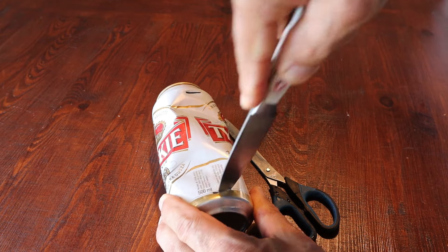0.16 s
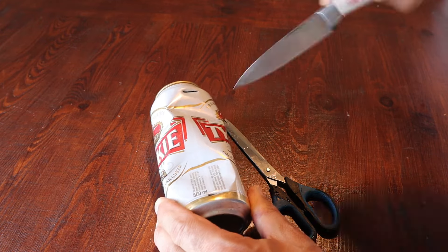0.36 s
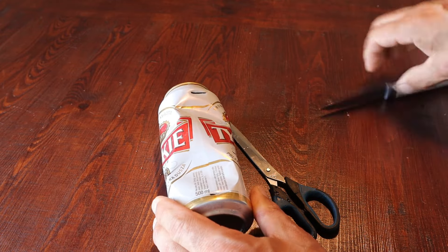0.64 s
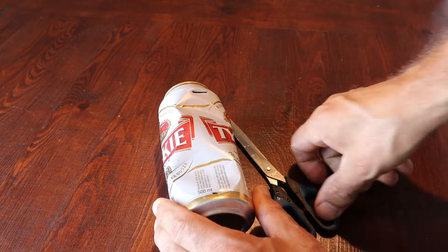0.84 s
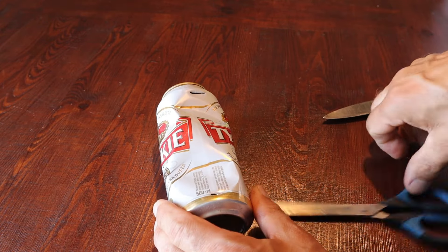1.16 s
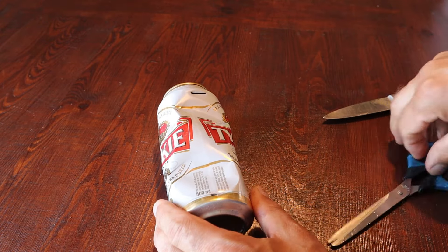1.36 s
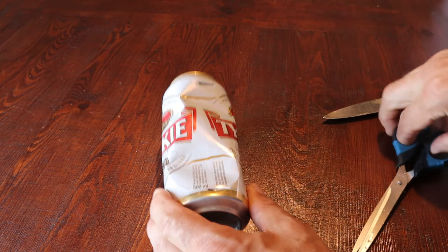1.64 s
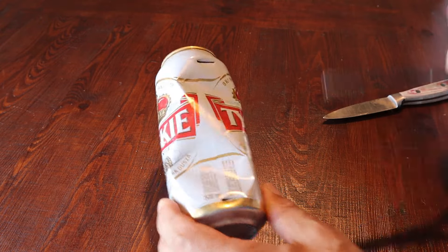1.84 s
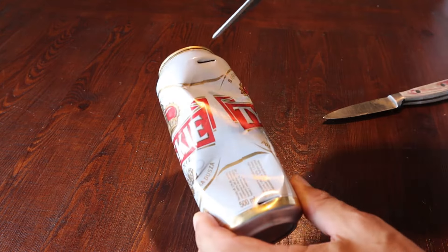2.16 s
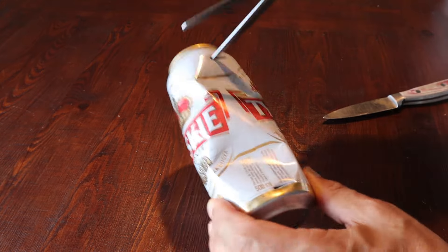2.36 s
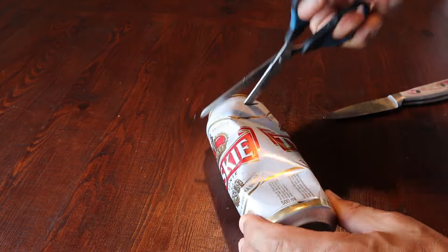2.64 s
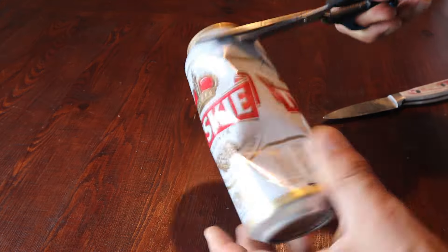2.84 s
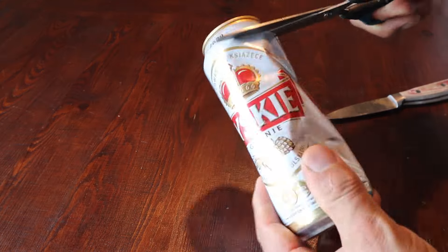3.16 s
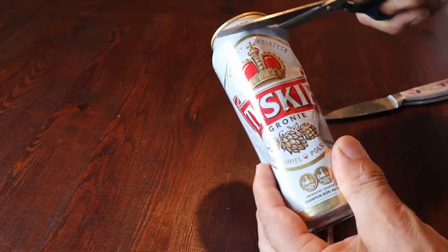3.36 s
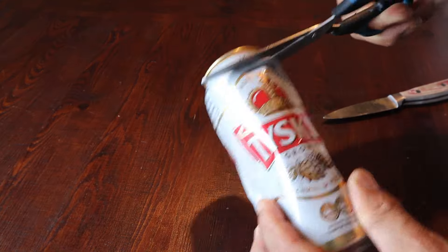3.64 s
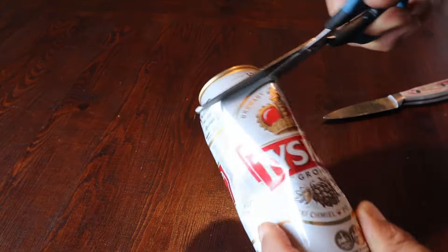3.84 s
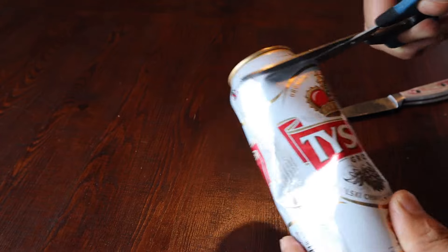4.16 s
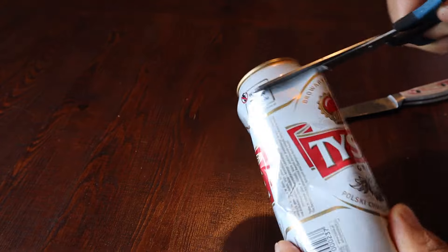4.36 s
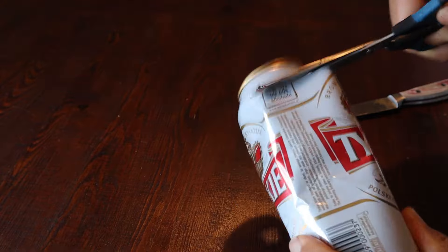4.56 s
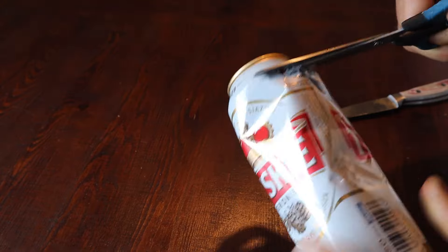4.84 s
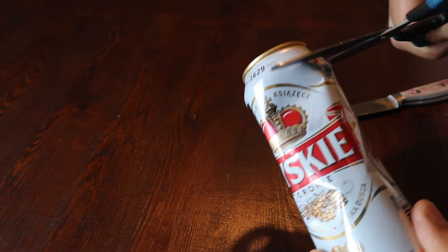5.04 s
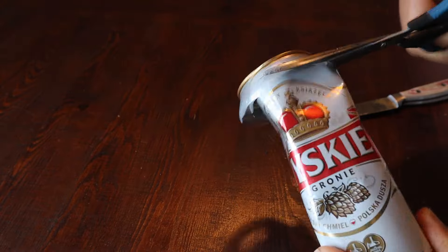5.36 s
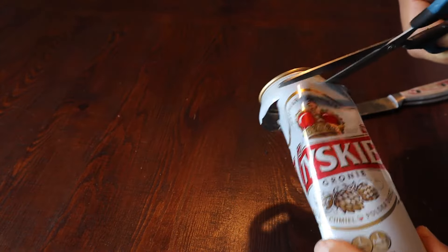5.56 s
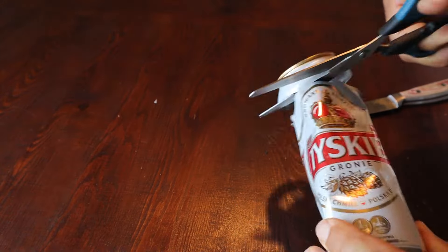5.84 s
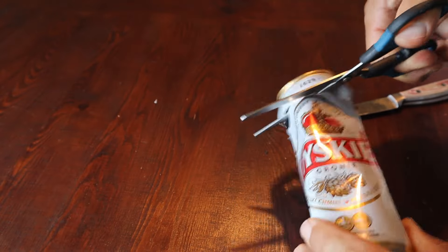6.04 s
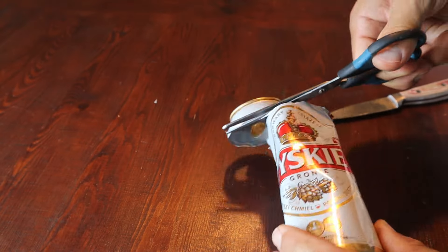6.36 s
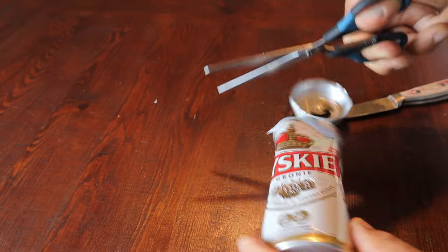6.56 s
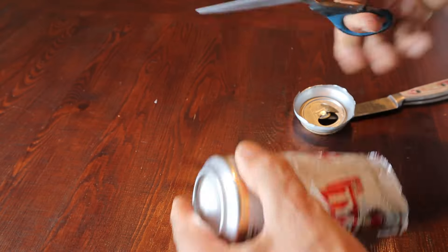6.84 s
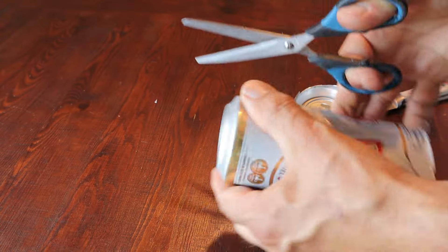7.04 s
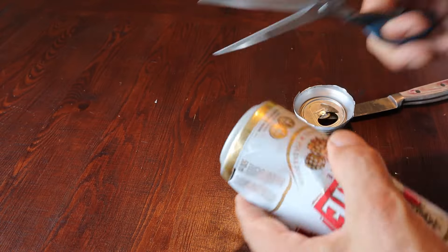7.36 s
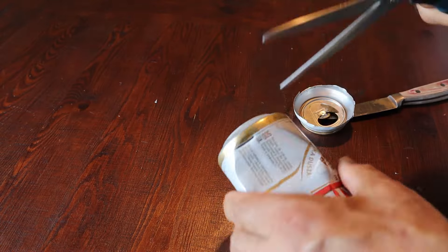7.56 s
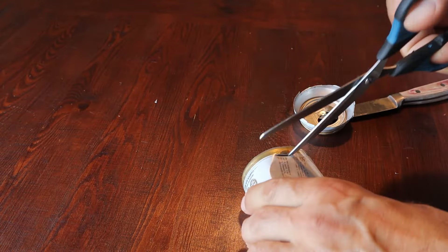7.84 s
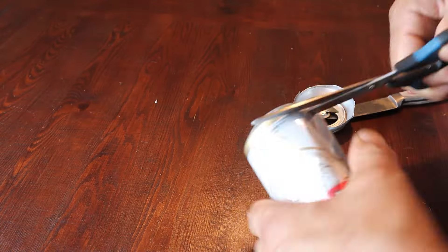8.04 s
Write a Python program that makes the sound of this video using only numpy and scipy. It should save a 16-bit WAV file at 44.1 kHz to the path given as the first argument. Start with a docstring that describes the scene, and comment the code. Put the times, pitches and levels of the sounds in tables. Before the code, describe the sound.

Close up in a small room, a knife pushes into an empty aluminium can with dull thuds and sharp buckling cracks. The knife clacks down on a wooden table and scissors scrape off it. After a brief lull the can pops and dents, then scissors bite around it in irregular crinkly crunches. The cut top drops with a short bright rattle, the can flexes, and a new cut begins.

```python
"""Cutting open a thin aluminium can

A knife stabs the can and is put down on a wooden table; scissors are dragged off the table
and cut round the can's neck in quick crinkling bites. The top drops and rings, and a new cut begins.
Every contact is a short swarm of tiny snaps filtered by the resonances of can or table; slides are
shaped noise and snaps, ringing is decaying sines, and a small room adds close echoes over a faint hush."""
import sys
import numpy as np
from scipy import signal
from scipy.fft import rfft, irfft
from scipy.io import wavfile
from scipy.ndimage import uniform_filter1d

SR = 44100
rng = np.random.default_rng(int(sys.argv[2]) if len(sys.argv) > 2 else 0)


def write(x):
    x = np.atleast_2d(x).T
    wavfile.write(sys.argv[1], SR, np.round(np.clip(x, -1, 1) * 32767).astype(np.int16))


N = 361179

EDGE_HZ = 15950  # upper band limit

# The severed top hits the table and rattles. Each row: time in seconds (the crack falls 1 ms earlier),
# decay time in seconds, level in dB at 850-2800 Hz before the layer's gain, then body, edge and fizz
# (below, above and far above that band) in dB relative to that level, low ring of the panel in Hz,
# upper ring in Hz, ring of the sliver or edge in Hz.
LID_BOUNCES = [(6.452, 0.0083, -39.5, 5.5, 10.2, 19, 408, 2720, 7600),
               (6.526, 0.01, -43.5, 9, 12, 6, 403, 2310.0, 6840.0),
               (6.588, 0.007, -49.5, 13, 18, 24, 405, 2770, 7300),
               (6.62, 0.0061, -25, 1, 12.5, -1, 760, 2360, 4040.0),
               (6.647, 0.011, -26, 5.5, 7.4, 6.5, 517, 1970, 4080),
               (6.671, 0.014, -28.5, 0.5, 9.1, -4, 800, 2430, 4030),
               (6.712, 0.011, -42, 3.5, 11, 8.5, 660, 2330.0, 4030)]
# Resonances of the can. Each row: frequency in Hz, width in Hz, peak in dB relative to the flat part.
CAN_MODES = [(370, 26, -8), (427.3, 68, -1), (603.3, 25, 1), (763.7, 20, 3.5), (892, 24, 3.5),
             (1103, 27, -1), (1380, 37, -4), (1540, 28, -5), (2152, 28, 1.5), (8650, 180, -10)]
# Resonances of the table. Each row: frequency in Hz, width in Hz, peak in dB relative to the flat part.
TABLE_MODES = [(98, 12, 11.5), (205, 23, 11), (339, 12, -7), (405, 36, 2.5), (519, 17, -21.5),
               (825, 16, -11), (1210, 33, -21.5), (1170, 29, -5.5)]
# Spectrum of the thin wall. Each row: frequency in Hz, relative level in dB.
CAN_COLOUR = [(40, -22), (150, -22), (260, -5), (380, 2.5), (1500, 1.5), (2200, -5.5), (3200, -12.5),
              (4700, -14), (6200, -16), (8200, -13.5), (10300, -20), (12500, -18), (16000, -27)]
# Spectrum of hard objects on wood. Each row: frequency in Hz, relative level in dB.
TOOL_COLOUR = [(40, -22), (100, 1.5), (250, -5.5), (450, 0.5), (1200, 1), (2500, -13), (4500, -19.5),
               (8000, -20.5), (11000, -25.5), (16000, -30.5)]


def amp(db):
    """Level law: decibels to an amplitude ratio."""
    return 10 ** (np.asarray(db) / 20)


def evened(x):
    """Normalization: scales a signal to rms 1."""
    return x / np.sqrt(np.mean(x ** 2) + 1e-20)


def read(points, hz):
    """Spectral interpolation: reads a curve along a logarithmic frequency axis."""
    f, value = np.transpose(points)
    return np.interp(np.log(hz + 1), np.log(f), value)


def add(mix, s, sound):
    """Superposition: sums a sound into the mix at time s."""
    start = round(s * SR)
    part = mix[max(start, 0):max(start + len(sound), 0)]
    part += sound[max(-start, 0):][:len(part)]


def smooth_noise(shape, size):
    """Low-passed randomness: noise averaged over size samples, rms 1."""
    return evened(uniform_filter1d(rng.standard_normal(shape), size=size, axis=-1))


def resonances(modes, hz):
    """Modal response: each causal mode lifts a narrow peak out of a flat spectrum."""
    return np.prod([1 + amp(db) / (1 + 2j * (hz - f) / width) for f, width, db in modes], axis=0)


def coloured(x, colour, modes=()):
    """Linear filtering: shapes x by a spectrum and the modes of a body; rms 1."""
    hz = np.fft.rfftfreq(N, 1 / SR)
    return evened(irfft(rfft(x) * amp(read(colour, hz)) * resonances(modes, hz), N))


def snaps(size, per_s, spread_db):
    """Impulsive excitation: a random train of fractures or slips whose sizes scatter with spread_db."""
    chance = rng.random(size)
    big = rng.exponential(1, size)
    sign = rng.choice([-1., 1.], size)
    return (chance < per_s / SR) * sign * amp(spread_db * np.minimum(big, 3))


def ticking(size):
    """Intermittent tearing: sharp surges that decay after each jump of the tear; mean 1."""
    ticks_per_s, tick_s = 260, 0.0022
    jumps = (rng.random(size) < ticks_per_s / SR) * rng.uniform(0.59, 1, size)
    surges = signal.lfilter([1], [1, -np.exp(-1 / (tick_s * SR))], jumps)
    return surges / (surges.mean() + 1e-12)


def steadied(parts, force):
    """Forced response: holds the loudness of each band close to the force that drives it."""
    steady = .68  # 0-1: how closely the sound follows the force
    wanted, found = abs(uniform_filter1d(np.array([force, parts]) ** 2, size=150, axis=2))
    found = found / found.max(1, keepdims=True)
    return parts * ((wanted + 1e-9) / (found + 1e-9)) ** (steady / 2)


def contacts(rows, colour, modes, per_s, spread_db, crack, rise, ring_db, ring_width_hz, dent_db, tail_db):
    """Excitation and resonance: swarms of snaps swell to a crack and die, ringing panel and body."""
    band_edges_hz = [850, 2800, 7000]  # Each entry: upper edge in Hz of the body, mids and edge bands.
    # Weak tearing and ringing after each crack, one row each for body, mids, edge and fizz.
    # Each row: level in dB relative to the force (before tail_db), decay in seconds, depth of ticks 0-1.
    aftermath = [(-15, 0.014, 0), (-18.5, 0.013, 0.16), (-19, .026, 0.26), (-26.5, .025, 0.3)]
    bend = .018  # share by which the body's modes shift from one contact to the next
    swell_power = 1.22  # 1 would be an exponential swell, more is steeper
    size = 12288
    crest = size // 4
    out, hz = np.zeros(N), np.fft.rfftfreq(size, 1 / SR)
    t = (np.arange(size) - crest) / SR

    below = [1 / (1 + (hz / edge) ** 6) for edge in band_edges_hz]
    bands = np.diff([0 * hz, *below, 1 + 0 * hz], axis=0) * amp(read(colour, hz))
    after_db, after_s, depth = np.transpose(aftermath)[:, :, None]
    after = (t > 0) * amp(after_db + tail_db) * np.exp(-abs(t) / after_s)

    for s, length, db, body_db, edge_db, fizz_db, low_hz, high_hz, sliver_hz in rows:
        away = np.where(t < 0, (abs(t) / (length * rise)) ** swell_power, abs(t) / length)
        force = np.exp(-away) + after
        swarm = snaps(size, per_s, spread_db) * force.mean(0)
        swarm[crest] += crack * np.linalg.norm(swarm)

        body = resonances(modes, hz * np.exp(bend * rng.standard_normal()))
        # low and upper ring of the panel, and a sliver or struck edge in the treble
        rings = [(low_hz, ring_width_hz, ring_db), (high_hz, 160, 7), (sliver_hz, 200, 3)]
        panel = resonances(rings, hz)
        # every point of contact has its own scatter of weaker treble modes
        dents_hz = np.geomspace(1900, 13000, num=12) * np.exp(rng.uniform(-.08, .08, size=12))
        panel *= resonances([(f, ring_width_hz + 0.0058 * f, dent_db) for f in dents_hz], hz)
        # a stiffer panel radiates little below its lowest mode
        panel *= 1 - 0.46 / (1 + (hz / (0.48 * low_hz)) ** 6)

        parts = steadied(irfft(rfft(swarm) * body * panel * bands, size), force)
        parts = parts * (1 - depth + depth * ticking(size))
        # levels become energies over the length of the swarm
        levels = amp(db + np.array([body_db, 0, edge_db, fizz_db])) * np.sqrt(length * SR * (1 + rise) / 2)
        add(out, s + t[0] - .001, levels / (np.linalg.norm(parts, axis=1) + 1e-12) @ parts)
    return out


def background_hush():
    """Partial coherence: steady coloured noise, partly common to both ears and partly separate."""
    # Spectrum of the hush. Each row: frequency in Hz, relative level in dB.
    hush_colour = [(20, 4), (60, 2), (130, -0.5), (220, 1.5), (500, 1), (1200, -2.5), (3000, -8.5),
                   (8000, -13), (16000, -15)]
    shared, left, right = (coloured(noise, hush_colour) for noise in rng.standard_normal((3, N)))
    return amp(-64.0) * (shared + .5 * np.array([left, right]))


def room(x, build_s):
    """Reverberation: dense echoes, each band dying at its own rate, from three slowly alternating tails."""
    # Reverberation time. Each row: frequency in Hz, time to fall by 60 dB in seconds.
    room_t60 = [(100, 0.23), (400, 0.23), (1000, 0.21), (3000, 0.2), (8000, 0.28), (16000, 0.17)]
    # Strength of the echoes. Each row: frequency in Hz, level in dB.
    room_db = [(100, -11.5), (500, -5.5), (1500, -11.5), (4500, -9), (12000, -16.5)]
    out, s = np.zeros(N), np.arange(N) / SR
    for turn in np.arange(3) / 3:
        hz, t, z = signal.stft(rng.standard_normal(SR // 2), SR, nperseg=256)
        fall = amp(-60 * t / read(room_t60, hz)[:, None]) * (1 - np.exp(-t / build_s))
        fall *= amp(read(room_db, hz))[:, None] / np.sqrt((fall ** 2).mean(1, keepdims=True) * SR / 2)
        echoes = signal.istft(z * fall, SR, nperseg=256)[1]
        # the squares of the three shares always sum to 1
        share = np.sqrt(2 / 3) * np.cos(np.pi * (s + turn))
        out += signal.fftconvolve(x * share, echoes)[:N]
    return out


def widen(x, drift):
    """Interaural phase: both ears get one sound turned apart; the turn wanders more at higher pitch."""
    # The stereo image shifts from passage to passage. Each row: start in seconds, radians by which left
    # leads in the bass, Hz where the bass ends, radians in the mids, Hz where they end, radians in the
    # upper mids, Hz where they end, radians in the treble, Hz where it ends, radians above.
    image = [(0, 0.43, 450, 3.5, 1270, 0.66, 2220, 1.27, 3700, 1.22),
             (0.53, 0.53, 670, -2.5, 1410, 1.25, 1800, 0.6, 2850, -1.75),
             (1.41, -2.5, 580, 0.5, 3770, 3.5, 4970, 0.6, 6530, 1.45),
             (2.2, 4, 410, 1.5, 620, -1.96, 1360, 1, 3945, -1.75),
             (2.55, 3.5, 480, -1.5, 1140, 1.16, 3700, 3, 4600, 1.82),
             (3.1, -1.5, 970, 0.68, 1570, -1.9, 2320, 2.5, 2800, -1.77),
             (3.35, -1.53, 1010, 0.52, 1800, 3, 2910, -2.1, 6100, -1.68),
             (4.29, -1.43, 710, 0.93, 1310, 2.5, 2430, 2, 3330, 1.7),
             (5.0, -1.27, 1310, -1.5, 1790, 2.2, 2930, -2, 7800, -1.55),
             (5.45, -1.3, 1790, -2.22, 3920, 1, 5460, 3, 7700, -1.47),
             (6.3, -1, 1180, 2, 2630, 0.73, 4450, -1.87, 7370, -1.15),
             (6.93, -2, 440, -0.8, 2430, 1.57, 3890, -1.85, 5510, -1.4),
             (7.75, 1.5, 320, 3.5, 643, 0.8, 1900, -1.85, 8100, 0.6),
             (8.02, 2.8, 540, 0.87, 1230, 1.15, 2930, 3.5, 4340, 1.8)]
    hz, t, z = signal.stft(x, SR, nperseg=1024, noverlap=768)
    f = hz[:, None]
    passage = np.searchsorted([row[0] for row in image[1:]], t, "right")
    _, bass, bass_hz, mids, mids_hz, upper, upper_hz, treble, treble_hz, top = np.array(image)[passage].T
    in_band = [f < bass_hz, f < mids_hz, f < upper_hz, f < treble_hz]
    lead = np.select(in_band, [bass, mids, upper, treble], top) * (f > 0)
    wander = rng.standard_normal(z.shape)
    for _ in range(2):
        wander = uniform_filter1d(uniform_filter1d(wander, size=12, axis=0), size=110, axis=1)
    lead = uniform_filter1d(lead, size=3, axis=1) + drift * evened(wander) * np.sqrt(f / EDGE_HZ)
    pair = z * np.exp(.5j * np.array([lead, -lead]))
    return signal.istft(pair, SR, nperseg=1024, noverlap=768)[1][:, :N]


def table(cuts, per_s, spread_db, dull_hz):
    """Friction and structure-borne sound: wood scrapes, rumbles and shakes with the cuts, under low thuds."""
    # Tools and can are dragged over the wood. Each row: start in seconds, length in seconds,
    # rumble of the table in dB, scrape in dB.
    slides = [(0.069, 0.27, -42.5, -60), (0.597, 0.087, -48.5, -40.5), (0.714, 0.15, -36, -43),
              (0.886, 0.16, -46, -56), (1.037, 0.19, -40.5, -41), (1.247, 0.07, -39, -38.5),
              (1.458, 0.011, -37.5, -43), (1.529, 0.14, -44, -35.5), (2.51, 0.024, -45, -51.5),
              (6.44, 0.28, -48.5, -74), (7.892, 0.093, -40.5, -34)]
    # Low thuds of the stabbed can and of the knife put down on the table. Each row: start in seconds,
    # envelope peak in dB, frequency in Hz, twice the time from start to envelope peak in seconds.
    thuds = [(0.079, -18, 203, 0.0092), (0.11, -27.5, 336, 0.017), (0.174, -21.5, 302, 0.018),
             (0.196, -25, 334.6, 0.036), (0.268, -25, 311.4, 0.035), (0.334, -25, 326, 0.011),
             (0.683, -27.5, 192, 0.0021)]
    # Spectrum of the rumble. Each row: frequency in Hz, relative level in dB.
    rumble_colour = [(20, -24), (50, -8.5), (90, 0.5), (150, 0), (220, 0.5), (320, -9), (600, -48),
                     (2000, -73)]
    attack_s, release_s = 0.012, 0.021
    cut_rumble_db = -31  # share of each snip that reaches the table through the can
    lean_s, lean_db_per_s = 4.3, 9.5  # for 1.5 s until then the hand leans ever more firmly on the can

    now = np.arange(N) / SR
    weight, scrape = np.zeros((2, N))
    for s, length, rumble_db, scrape_db in slides:
        stroke = np.clip((now - s) / attack_s, 0, 1)
        stroke = stroke * np.exp(-np.maximum(now - s - length, 0) / release_s)
        weight += amp(rumble_db) * stroke
        scrape += amp(scrape_db) * stroke

    shake = np.sqrt(abs(uniform_filter1d(cuts ** 2, size=1300)))
    shake *= amp(np.clip(now - lean_s, -1.5, 0) * lean_db_per_s)
    rumble = coloured(rng.standard_normal(N), rumble_colour, TABLE_MODES)
    out = (weight + amp(cut_rumble_db) * shake) * rumble

    dulling = signal.butter(1, [300, dull_hz], "band", fs=SR, output="sos")
    grit = signal.sosfilt(dulling, snaps(N, per_s, spread_db))
    out += scrape * coloured(grit, TOOL_COLOUR, TABLE_MODES)

    t = np.arange(SR // 4) / SR
    for s, db, hz, decay in thuds:
        swell = 2 * t / decay * np.exp(1 - 2 * t / decay)
        add(out, s, amp(db) * swell * np.sin(2 * np.pi * hz * t))
    return out


def blades(waver, flutter_db):
    """Friction-driven vibration: steel sliding on steel gives thin tones, unsteady in pitch and level."""
    # The scissor blades sing faintly as they open. Each row: start in seconds, length in seconds,
    # level in dB before flutter, mean frequency in Hz.
    blade_song = [(1.957, 0.079, -54, 4660), (2.04, 0.097, -56.5, 4655), (2.155, 0.14, -62, 5080)]
    out = np.zeros(N)
    for s, length, db, hz in blade_song:
        size = round(length * SR)
        grip, bend = smooth_noise((2, SR), 500)[:, :size]
        phase = 2 * np.pi * np.cumsum(hz * (1 + waver * bend)) / SR
        add(out, s, np.sqrt(np.hanning(size)) * amp(db + flutter_db * grip) * np.sin(phase))
    return out


def tool_knocks():
    """Impact: knife and scissors knock on the table, whose wood damps their ring."""
    # Each row: the same columns as LID_BOUNCES.
    knocks = [(0.563, 0.01, -42, 14.5, 4, -23, 650, 1070.0, 3620),
              (0.606, 0.0069, -33.5, 8, 2, -2, 453, 2110, 7600),
              (0.686, 0.0064, -22, 0, -6, -16.5, 520, 1010, 3340),
              (0.694, 0.0045, -17.5, 15, -28, -33, 510, 1030, 3170.0),
              (0.723, 0.0078, -8, -7, -21.5, -60, 637, 1160.0, 3150),
              (0.748, 0.0072, -21, 2, -17, -45, 430, 1180, 2680),
              (0.765, 0.012, -23, 0, -20, -45, 480, 1330, 3500),
              (0.79, 0.015, -28.5, 6, -27, -45, 400, 1400, 2600),
              (0.777, 0.0062, -23, 9.5, -24, -47, 328, 1140, 3470),
              (0.803, 0.013, -37, 19, -16, -38, 544, 980, 3330.0),
              (0.829, 0.0095, -43.5, 21.5, -24, -34, 393, 1040.0, 3000.0),
              (0.85, 0.0037, -48, 16, -22, -26, 474, 980.0, 3000.0),
              (0.907, 0.0045, -38, 11.5, -26, -28, 423.0, 1170, 3000.0),
              (0.972, 0.0093, -10, -16, -10.5, -15.5, 940, 934, 3960),
              (0.989, 0.0078, -21, 1.5, -13, -19, 415, 1560, 2600),
              (1.009, 0.0096, -19.5, 3, -7, -16.5, 407, 1680, 4450),
              (1.122, 0.018, -45, 15.5, -26, -29, 400, 1200, 3400),
              (1.186, 0.012, -35.5, 4.5, -19, -26, 415, 1210, 3600),
              (1.238, 0.0072, -33.5, -4, -11, -24, 430, 1260, 3500),
              (1.266, 0.012, -30.5, -9.5, -15, -27, 515, 1230, 3200),
              (1.289, 0.0069, -35.5, -3, -19, -24, 420, 1200, 3100),
              (1.316, 0.0051, -49, 4, -21, -26, 480, 1200, 3080),
              (1.451, 0.0092, -34, 10.5, -28.0, -26, 760, 930, 3700),
              (1.557, 0.017, -31, 13, -24, -57, 476, 1280, 3000.0),
              (1.698, 0.0092, -20, -12.5, 6.5, 0.5, 710.0, 1860, 7150),
              (1.788, 0.02, -31, 0.5, -14, -23, 520, 1160, 3100)]
    return amp(-4.5) * contacts(knocks, TOOL_COLOUR, TABLE_MODES, per_s=6000, spread_db=-0.5, crack=0.1,
                                rise=0.59, ring_db=9.5, ring_width_hz=90, dent_db=3.5, tail_db=-0.5)


def lid_rattle():
    """Repeated impact: the light severed top bounces on the table in bright swarms of snaps."""
    return amp(-4.5) * contacts(LID_BOUNCES, TOOL_COLOUR, CAN_MODES, per_s=12000, spread_db=2.5, crack=0.22,
                                rise=0.98, ring_db=11.0, ring_width_hz=27, dent_db=10.0, tail_db=-0.5)


def lid_ring(ring_db):
    """Free vibration: the top's stiff rim rings in decaying modes, differently for each point that hits."""
    # Modes of the top. Each row: frequency in Hz, relative level in dB, time to fall by 60 dB in seconds.
    lid_modes = [(860, -19.5, 0.47), (1890, -18, 0.43), (2265, -4.5, 0.27), (2870, 2.5, 0.25),
                 (2916, -1.5, 0.18), (3300, -6, 0.151), (3480, -5.5, 0.19), (3950, 0, 0.07),
                 (3980, 3.5, 0.14), (4270, 2, 0.12), (4990, -1.5, 0.18), (5500, -24, 0.15),
                 (6150, -21.5, 0.24), (7000, -30.5, 0.18), (7500, -17.5, .25), (7800, -26, .22)]
    rim_bend = .004  # share by which the warped rim detunes from bounce to bounce
    shimmer_db = 4  # each mode shimmers as the top wobbles on the wood
    out, t = np.zeros(N), np.arange(SR // 2) / SR
    hz, db, t60 = np.transpose(lid_modes)[:, :, None]
    for s, _, level_db, _, edge_db, *_ in LID_BOUNCES:
        strength_db = db + rng.uniform(-4, 4, hz.shape)
        strength_db = strength_db + shimmer_db * smooth_noise((len(hz), len(t)), 900)
        bent_hz = hz * (1 + rim_bend * rng.standard_normal(hz.shape))
        waves = np.sin(2 * np.pi * (bent_hz * t + rng.random(hz.shape)))
        modes = amp(strength_db - 60 * t / t60) * waves
        onset = 1 - np.exp(-t / 0.0015)
        add(out, s - .003, amp(level_db + edge_db + ring_db) * modes.sum(0) * onset)
    return out


def hollow(ring_db):
    """Free vibration: a dent that pops sets the whole can ringing in one decaying mode."""
    # Each row: start in seconds, level in dB before ring_db and the onset, frequency in Hz,
    # time to fall by 60 dB in seconds.
    pops = [(2.33, -37.5, 543, 0.18), (2.67, -28, 528, 0.28), (7.125, -18.5, 553, 0.056),
            (8.164, -24, 576, 0.026)]
    out, t = np.zeros(N), np.arange(SR // 2) / SR
    for s, db, hz, t60 in pops:
        envelope = amp(db + ring_db - 60 * t / t60) * (1 - np.exp(-t / .004))
        add(out, s, envelope * np.sin(2 * np.pi * hz * t))
    return out


def buckling():
    """Elastic instability: a point or thumb pushes the hand-damped wall in until it buckles."""
    # Each row: the same columns as LID_BOUNCES.
    buckles = [(0.099, 0.0028, -14, -2, 3.5, -8, 666, 2290.0, 4900),
               (0.107, 0.013, -8.5, -4.5, -8, -18, 710, 2330, 4760),
               (0.133, 0.0094, -10, -24, -4.5, -14, 670, 1060, 3500),
               (0.18, 0.053, -22, -1.5, -4, -19, 320, 1060, 3500),
               (0.217, 0.018, -14, -2, -11, -27, 720, 1120, 3170),
               (0.304, 0.012, -14.5, -0.5, -11, -18, 615, 1110, 3120),
               (0.342, 0.0066, -6.5, -19, -11.0, -20, 544, 2240, 3200),
               (0.358, 0.007, -12, -6, -2, -7.5, 540, 2100.0, 3560),
               (2.215, 0.026, -57, 1, 5, 1, 610, 2100, 4850),
               (2.33, 0.0089, -15.5, -0.5, -11.5, -12, 712, 1136, 3040),
               (2.415, 0.014, -23.5, -12, -9.5, -14, 336, 1080.0, 4050),
               (2.571, 0.0092, -31.5, 1, -9, -16, 836, 920, 3330.0),
               (2.607, 0.0084, -12.5, 3.5, -12.5, -32, 818, 1100, 3300),
               (2.641, 0.0098, -14, 4, -7.5, -31, 685, 1360, 3230),
               (2.673, 0.0021, -6, -18, -8.5, -38, 500, 2030, 2820),
               (2.677, 0.022, -12, -7, -12, -34, 354, 1340, 3250),
               (2.687, 0.0054, -6, -10, -17, -35, 530, 2010.0, 3250.0),
               (2.702, 0.018, -8.5, -20, -22, -35, 680, 1465, 3300),
               (2.732, 0.02, -20, 5.5, -8.5, -24, 795, 980, 7900),
               (2.757, 0.03, -30, 15, -8, -25, 545, 980, 5170),
               (2.827, 0.0089, -17, -13, -2.5, -45, 820, 1290, 2740),
               (2.885, 0.016, -24.5, -1, -10, -12.5, 697, 1280.0, 8600),
               (2.993, 0.011, -25, 7, -7.5, -14, 335, 1110, 3550),
               (3.021, 0.015, -20.5, 3.5, -10, -14.5, 333, 1290, 3640),
               (3.08, 0.0056, -23, 2, -20.5, -30, 646, 1030, 3530),
               (6.767, 0.022, -32.5, 4, -4.5, -14.5, 615, 1670, 3800),
               (6.972, 0.0052, -43, 3, -12, -18, 640, 1097, 3980.0),
               (7.008, 0.0093, -35.5, 2.5, -7, -14, 670, 1720, 2900),
               (7.068, 0.015, -25, -8, -16, -25, 600.0, 1780, 4780),
               (7.119, 0.0095, -14, -9, -12.5, -23, 593, 1180, 3000.0),
               (7.129, 0.0066, -6, -9, -9, -20, 584, 1454, 2960),
               (7.2, 0.008, -37, 2, -13, -12, 600, 983, 7390.0),
               (7.255, 0.01, -42.5, 7.5, -11.5, -12.5, 590, 1685, 3740),
               (7.439, 0.0082, -48.0, 24, -7, -23, 585, 934, 4140),
               (7.517, 0.0072, -25, -6, 6.5, 6, 810, 2580, 4020),
               (7.551, 0.0093, -51, 32.5, -11, -11, 451, 1650.0, 7520.0),
               (7.575, 0.0053, -30.5, 6.5, 10.5, 7.5, 602, 1800, 9250),
               (7.822, 0.002, -30, 19, -2, -14, 460, 996, 7830),
               (7.829, 0.0028, -25, 17, -5.5, -26, 605, 990, 7700),
               (7.879, 0.0049, -30.5, 10, -2, -9.5, 480.0, 1070, 8000),
               (7.909, 0.0011, -15, 12, -16, -27, 710, 980, 7270.0),
               (7.939, 0.011, -22.5, 11, -10, -19, 483, 1000, 2980),
               (7.963, 0.0081, -25.5, 10, -7, -15, 473, 1380, 3400),
               (7.98, 0.0055, -23.5, 7, -12, -18, 600, 1690, 3300),
               (7.997, 0.013, -27, 4, -9, -13, 470, 1680, 3400),
               (8.013, 0.0032, -24.5, 10, -15.0, -19, 730, 970, 8200.0),
               (8.108, 0.017, -25.5, -10, -5, -20, 616, 2480, 5480.0),
               (8.14, 0.0092, -17, -9, -11, -24, 580, 1690, 5230)]
    return amp(-6.5) * contacts(buckles, CAN_COLOUR, CAN_MODES, per_s=8000, spread_db=1.5, crack=0.25,
                                rise=0.8, ring_db=8.5, ring_width_hz=60, dent_db=4.5, tail_db=-4)


def shearing():
    """Fracture: scissors shear the wall in a dense crunch whose crack is small beside the swarm."""
    # Each row: the same columns as LID_BOUNCES.
    snips = [(3.127, 0.011, -20, -9, -13.5, -16.5, 510, 1360, 3700),
             (3.157, 0.0057, -13, -5, -3.5, -1.5, 805, 1530, 8050),
             (3.2, 0.015, -24, 4.5, -3, -10, 610, 1010, 3470.0),
             (3.252, 0.012, -14, -0.5, -9.5, -26, 720, 1450, 3600),
             (3.318, 0.0038, -23, -7, -29, -35.5, 513, 1450, 3010.0),
             (3.355, 0.0087, -12, -8.5, -9, -20, 478, 1500, 3520),
             (3.422, 0.0033, -12.5, -3, -15.5, -21, 513, 1590, 3500),
             (3.469, 0.0083, -13.5, -3.5, -8.5, -19, 352, 1410, 3600),
             (3.489, 0.0029, -14.5, -6, -20.0, -26, 370.0, 1370, 4250.0),
             (3.581, 0.0044, -15, -10, -9, -21, 415, 1430, 3420.0),
             (3.591, 0.0099, -13.5, -5, -12.5, -16.5, 351, 1420, 3550),
             (3.645, 0.0036, -48, 19, 3, 5, 408, 1340.0, 7250.0),
             (3.734, 0.02, -23, -3, -10.5, -21, 354, 1300, 3300),
             (3.832, 0.0084, -16, -1.5, -1, -10, 777, 1503, 3370.0),
             (3.908, 0.017, -19.5, 3.5, -10, -18, 415, 1390, 3500),
             (3.928, 0.0069, -15, -3, -4, -5, 400, 1360, 3440),
             (3.944, 0.0023, -7, -32, -6, -15, 869, 1416, 4820.0),
             (4.048, 0.0047, -37.5, -2, -1, -6, 610, 2100, 4930.0),
             (4.1, 0.019, -34.5, 5.5, -7, -16, 378, 1380, 3140),
             (4.198, 0.0076, -37, 6.5, -5.5, -17, 556, 1370, 3540.0),
             (4.222, 0.013, -43, 8, -6, -15, 402, 1370, 3400),
             (4.25, 0.013, -43, 10, -8, -19, 410, 1110, 4500),
             (4.31, 0.01, -30.5, -3, -9, -7, 880, 1410, 7850.0),
             (4.337, 0.0056, -16.5, -6, -7.5, -5.5, 373, 1050, 8800),
             (4.38, 0.014, -31, 15, -4, -16, 358, 1390, 3820.0),
             (4.397, 0.0065, -23.5, 10, 8, 3, 386, 1340, 7500),
             (4.415, 0.012, -25.5, 10, -1, -6, 433, 980, 3830),
             (4.443, 0.0069, -22, 11, 1, -11, 498, 1480, 2980),
             (4.478, 0.0087, -17, 2, -25, -40, 590, 1110, 3000.0),
             (4.505, 0.0079, -15, -0.5, -3, -5.5, 420, 1580, 3420),
             (4.542, 0.013, -34, 7, 2, -8, 420, 1500, 4300),
             (4.581, 0.0067, -18, -0.5, -7.5, -42, 445, 1540, 3170.0),
             (4.617, 0.0033, -18.5, 6, -6, 3.5, 382, 1970, 6700),
             (4.636, 0.014, -16, 0, -5, -7, 408, 1480, 3940),
             (4.694, 0.0068, -21, 1, -9, -13, 423, 1340, 4200),
             (4.724, 0.0082, -30, 16, 3.5, -7, 441, 1530, 3270.0),
             (4.743, 0.0032, -12.5, 1, -11, -15, 413, 1490, 3000.0),
             (4.753, 0.0034, -23.5, 7, -10, -14, 410, 1500, 4300),
             (4.786, 0.0044, -27, 11, -17.5, -21.5, 437, 1530, 7960.0),
             (4.803, 0.0059, -19, 8, -3, -8, 646, 1220, 3120),
             (4.819, 0.0027, -22.5, 8, -4, -16, 432, 1550, 4400),
             (4.83, 0.005, -15.5, -3.5, -3, -2.5, 428, 1360, 7960),
             (4.9, 0.023, -37, 2.5, -13, -13, 490, 1520.0, 3020),
             (5.038, 0.0073, -30.5, 8.5, -6.5, -14, 405, 1510.0, 2990),
             (5.062, 0.0053, -16.5, -7, -8, -12, 466, 1200, 7870.0),
             (5.089, 0.0068, -14, -10, 1, 3, 704, 1690, 8280),
             (5.117, 0.015, -21, -4, -5, -20, 400, 1590, 5080.0),
             (5.193, 0.012, -29, 9, 6.5, -7, 424, 1690, 4820.0),
             (5.214, 0.023, -19, -7, -18, -27, 423, 1490.0, 8370.0),
             (5.234, 0.0078, -19, 4, -2.5, 2.5, 457, 1490, 8260),
             (5.327, 0.0098, -14, -8, -3, -9, 807, 1530, 3150),
             (5.405, 0.0067, -17, -0.5, -7, -11, 454, 1530, 8450.0),
             (5.426, 0.0045, -15, 1, 1, 2, 365, 1530, 8300),
             (5.443, 0.015, -20, -9, -13, -18, 410, 1150, 8500),
             (5.515, 0.025, -29.5, -3, -6.5, -12, 766, 1590, 4100),
             (5.547, 0.0059, -26.5, -4.5, -11, -7, 630, 1540, 8370.0),
             (5.57, 0.0041, -35.5, -6, 2, 0, 495, 1100.0, 7880.0),
             (5.632, 0.0092, -34.5, 12.5, -5.5, -22, 607, 1810.0, 3180.0),
             (5.676, 0.023, -32, 2.5, -6.5, -15, 422, 1110, 3300),
             (5.742, 0.0076, -13, -6, -5.5, -7.5, 820, 1530, 8200),
             (5.768, 0.013, -14, -5, -5, -13.5, 435, 1160, 3430),
             (5.842, 0.0087, -12.5, 1, -3, -5.5, 630, 1940, 9000),
             (5.933, 0.012, -35.5, -8, -12, -31, 557, 1100, 3420.0),
             (5.972, 0.012, -45, 10, -16, -33, 620, 1970.0, 3000.0),
             (6.008, 0.007, -39, 4, -2, -6, 600.0, 1870.0, 8930.0),
             (6.038, 0.0067, -21.5, 1.5, -6, -16, 503, 2520, 3480),
             (6.099, 0.0071, -23, 9, 5, 3, 602, 1960, 3900),
             (6.113, 0.011, -21.5, 3, -6.5, -17.5, 760, 2120, 3950.0),
             (6.169, 0.0086, -35.5, 6.5, -3.5, -29, 800, 1580, 3330.0),
             (6.232, 0.0052, -30, 6.5, -2, -13, 764, 930, 4960),
             (6.29, 0.0045, -37.5, 4.0, -7, -33, 610, 1840, 3480.0),
             (6.312, 0.0036, -33, 7, 6, -5, 597, 1900, 4100),
             (6.327, 0.0062, -30, 7.5, 7.5, 12.5, 583, 2920, 7200),
             (6.367, 0.015, -28, 4.5, 3.5, 6.5, 568, 2640, 9400),
             (8.039, 0.0073, -23, 1.5, 6.5, 7.5, 797, 2345, 8300),
             (8.051, 0.0074, -19, -7, -19, -10, 600, 1720, 5500),
             (8.061, 0.008, -20, -15, 2.5, -4, 835, 1680, 5100)]
    return amp(-3.5) * contacts(snips, CAN_COLOUR, CAN_MODES, per_s=11000, spread_db=2, crack=.05,
                                rise=0.88, ring_db=8, ring_width_hz=22, dent_db=6.5, tail_db=4.5)


def scene():
    """Superposition: can, tools, lid and table sound in the room, over a faint hush."""
    cuts = shearing()
    wood = table(cuts, per_s=2500, spread_db=0.0, dull_hz=2100)
    tools = tool_knocks() + blades(waver=.002, flutter_db=3)
    lid = lid_rattle() + lid_ring(ring_db=-13.0)
    can = buckling() + cuts + hollow(ring_db=12.0)
    direct = wood + tools + lid + can
    wet = direct + room(direct, build_s=0.00054)
    # a weaker set of echoes, opposite in sign at the two ears, widens the sound
    opposed = amp(-9.5) * room(direct, build_s=0.002) * np.array([[1], [-1]])
    return widen(wet, drift=0.71) + opposed + background_hush()


def record(dry):
    """Saturation and band limiting: the sharpest peaks are rounded off, then a low-pass is applied."""
    ceiling = .75
    rounded = dry / (1 + (dry / ceiling) ** 4) ** .25
    low_pass = signal.firwin(511, EDGE_HZ, window=("kaiser", 9), fs=SR)
    return signal.oaconvolve(rounded, low_pass[None], "same")


dry = scene()
out = record(dry)
write(out)
```